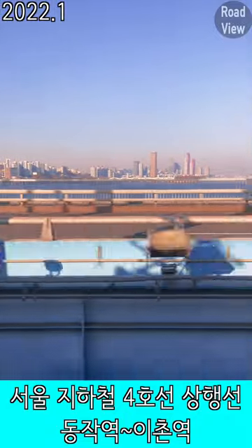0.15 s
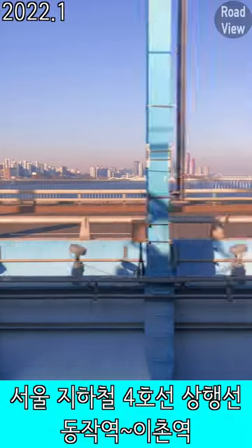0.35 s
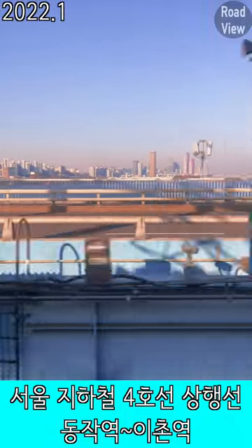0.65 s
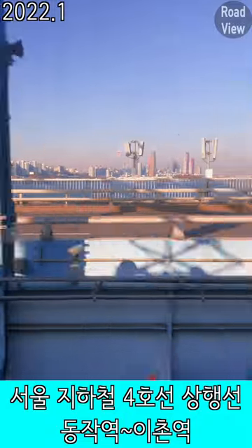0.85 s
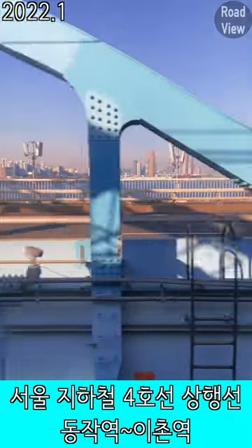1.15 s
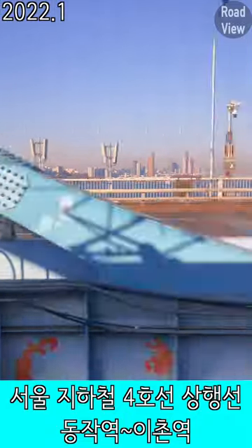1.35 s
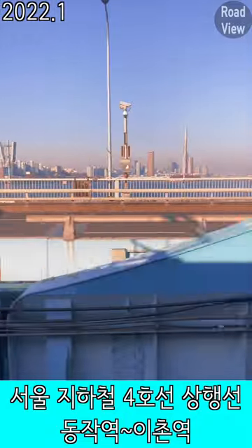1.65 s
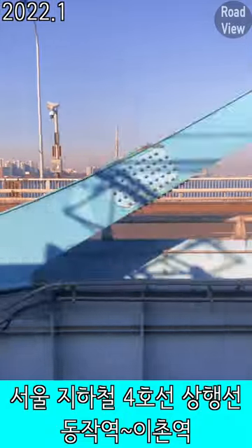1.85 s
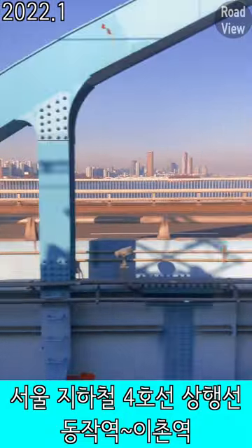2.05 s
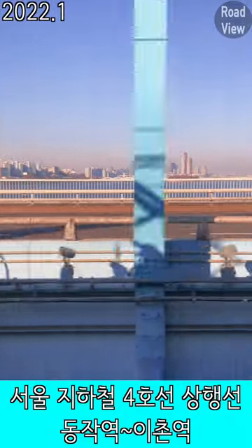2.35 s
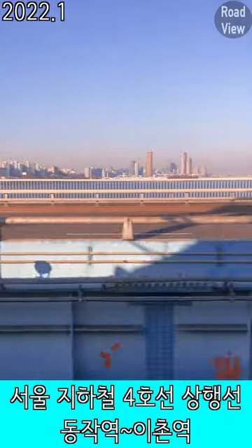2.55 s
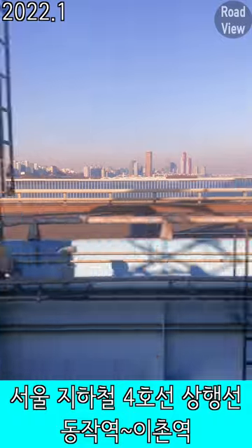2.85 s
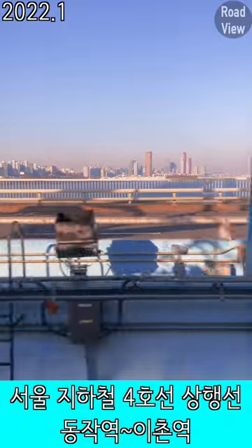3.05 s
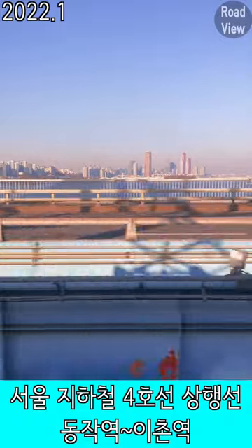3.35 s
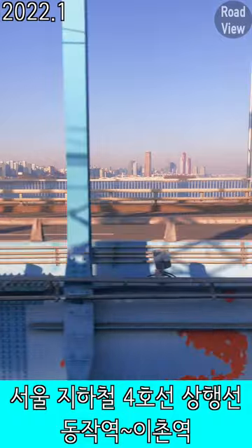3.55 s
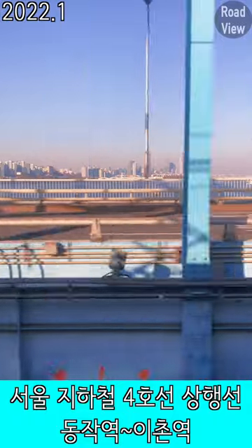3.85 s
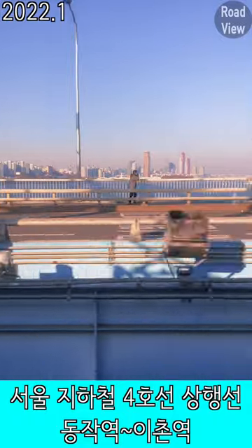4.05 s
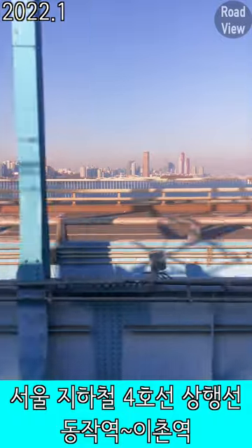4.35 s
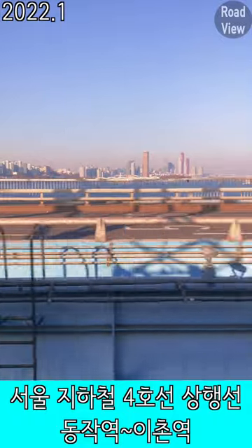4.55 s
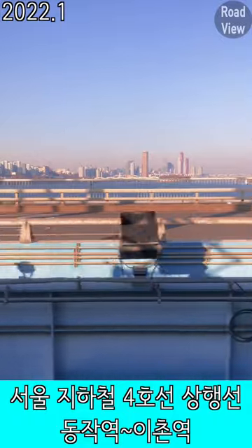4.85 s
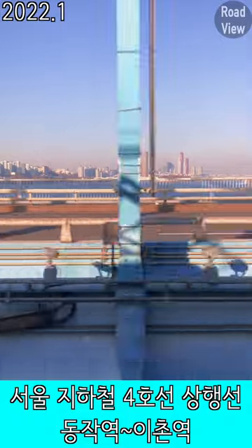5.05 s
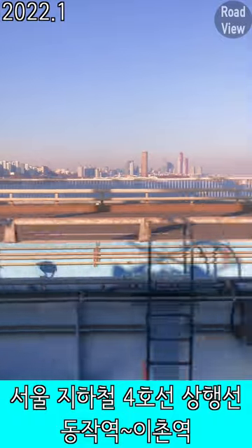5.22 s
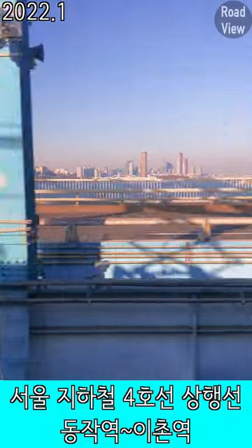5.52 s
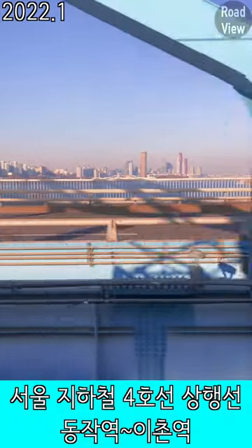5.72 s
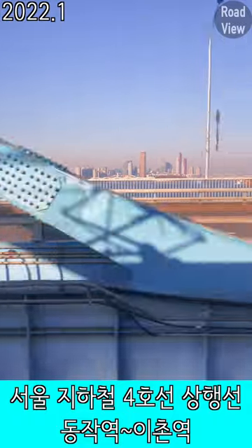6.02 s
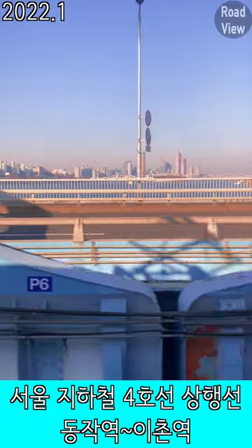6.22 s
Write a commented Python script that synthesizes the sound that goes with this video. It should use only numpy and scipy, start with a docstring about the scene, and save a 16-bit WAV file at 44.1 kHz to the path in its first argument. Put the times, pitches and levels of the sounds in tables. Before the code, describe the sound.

From inside a moving train car, close to the window, comes a deep, even rumble of wheels with the steel bridge booming underneath. Above it a metallic ringing and hiss rise and fall as steelwork goes by. Faint short squeaks, a bright tick and several blunt rail joint knocks come first. After a stretch of plain rolling, more knocks follow, and the boom grows stronger near the end.

```python
"""Booming girders and rumbling wheels, heard at the window of a metro car crossing a steel truss bridge.
The wheels ring and the rails hiss, swelling as posts of the truss pass and reflect them. Axles thud over
rail joints and loose fittings tick, among faint squeaks and very high whistles. The sound reaches a
phone's two microphone ports, the left a little before the right."""
import sys
import numpy as np
from scipy import signal
from scipy.fft import rfft, irfft, next_fast_len
from scipy.io import wavfile
from scipy.ndimage import uniform_filter1d, map_coordinates

SR = 44100
rng = np.random.default_rng(int(sys.argv[2]) if len(sys.argv) > 2 else 0)


def wav_record(signal):
    """Record a signal, one row per channel, as 16-bit PCM in the file named by sys.argv[1]."""
    frames = np.transpose(np.atleast_2d(signal))
    bounded = np.clip(frames, -1, 1)
    # unit amplitude maps onto the largest positive 16-bit level
    quanta = np.round(bounded * 32767).astype(np.int16)
    wavfile.write(sys.argv[1], SR, quanta)


N = 281343


def amp(db):
    """Gain of a level in dB."""
    return 10 ** (np.asarray(db) / 20)


def unit_rms(x):
    """x at rms 1."""
    return x / np.sqrt(np.mean(x ** 2) + 1e-20)


def at_hz(points, hz):
    """(freq_hz, value) points interpolated on a log axis."""
    freq_hz, values = np.transpose(points)
    return np.interp(np.log(hz + 1), np.log(freq_hz + 1), values)


def curves(rows):
    """One value per sample for each column after time_s."""
    time_s, *columns = np.transpose(rows)
    return [np.interp(np.arange(N) / SR, time_s, column) for column in columns]


def wobble(knots_per_s):
    """Smooth random curve."""
    knots = rng.standard_normal(int(N * knots_per_s / SR) + 4)
    return map_coordinates(knots, [np.arange(N) * knots_per_s / SR])


def swells(middle_s, gain_db, length_s):
    """Sum of bell-shaped gains in dB, per sample."""
    t = np.arange(0, N / SR + .01, .002)
    bells = np.broadcast(middle_s, gain_db, length_s)
    total_db = sum(db * np.exp(-(2 * (t - at_s) / span_s) ** 2) for at_s, db, span_s in bells)
    return curves(np.transpose([t, total_db]))[0]


def filtered(x, response):
    """x through a complex frequency response."""
    n = x.shape[-1]
    size = next_fast_len(n + SR // 4)
    return irfft(rfft(x, size) * response(np.fft.rfftfreq(size, 1 / SR)), size)[..., :n]


def filtered_ongoing(x, response):
    """Filtering with mirrored ends, for a sound that goes on before and after."""
    edge = 4096
    padded = np.pad(x, [(0, 0), (edge, edge)], "reflect", reflect_type="odd")
    return filtered(padded, response)[:, edge:-edge]


def patchy_noise(spectrum, patchy_db):
    """Two independent noises of one colour, rms 1, sharing patches of random gain."""
    bins = signal.stft(rng.standard_normal((2, N)), nperseg=512)[2]
    patches = uniform_filter1d(rng.standard_normal(bins.shape[1:]), size=6, axis=0)
    patches = uniform_filter1d(patches, size=10, axis=1)
    pair = signal.istft(bins * amp(patchy_db * unit_rms(patches)), nperseg=512)[1][:, :N]
    return unit_rms(filtered(pair, lambda hz: amp(at_hz(spectrum, hz))))


def mode_noise(modes, envelope):
    """Two independent enveloped noises, passed twice through (pitch_hz, width_hz, level_db) modes."""
    def response(f):
        return sum((-1) ** k * amp(db) * 1j * f * width_hz / (hz * hz - f * f + 1j * f * width_hz)
                   for k, (hz, width_hz, db) in enumerate(modes)) ** 2
    noise = rng.standard_normal((2, len(envelope)))
    return filtered(noise * envelope, response) / np.sqrt(np.mean(filtered(noise, response) ** 2))


def add(out, start_s, x):
    """Mixes x into out from start_s."""
    i = max(round(start_s * SR), 0)
    out[:, i:i + x.shape[1]] += x[:, :N - i]


def deck_mode(pitch_hz, level_db, waver_hz):
    """One deck mode, wavering and throbbing at random."""
    phase = 2 * np.pi * np.cumsum(pitch_hz + waver_hz * wobble(15)) / SR
    return np.sqrt(2) * amp(level_db - 0.5 * wobble(17)) * np.sin(phase) * [[1], [-.5]]


# main girder mode: time_s, pitch_hz
BOOM_PITCH = [(0.0, 80.3), (0.14, 69.9), (0.37, 72.4), (0.67, 58.36), (0.85, 72.3), (1.62, 72.2),
              (1.7, 63.1), (2.02, 71.3), (2.22, 88.85), (2.42, 61.2), (2.84, 58.96), (2.98, 68.63),
              (3.32, 72.2), (3.45, 59.7), (3.57, 71.13), (3.87, 76.1), (3.96, 65.1), (4.58, 73.7),
              (5.17, 64.6), (5.26, 77.1), (5.42, 69.75), (5.7, 77.13), (6.29, 63), (6.38, 73.3)]
# its throb: time_s, level_db
BOOM_LEVEL = [(0.0, -21), (0.07, -31), (0.1, -23), (0.28, -17.5), (0.39, -29), (0.44, -21), (0.83, -24),
              (1.28, -14.5), (1.9, -27.5), (2.18, -14.5), (2.22, -35), (2.33, -12.5), (2.42, -31),
              (2.47, -18.5), (2.91, -28), (3.07, -19), (3.11, -27), (3.22, -19), (3.29, -37), (3.32, -19),
              (3.52, -32), (3.55, -41), (3.64, -14.5), (3.7, -32), (3.75, -19), (3.92, -29), (4.17, -18),
              (4.21, -44), (4.26, -15), (4.39, -26), (4.44, -16), (4.48, -27), (4.67, -19.5), (4.78, -32),
              (4.94, -25), (4.97, -13), (5.08, -23.5), (5.4, -12), (5.45, -29), (5.54, -12.5), (5.63, -9),
              (5.69, -20), (5.76, -7.5), (5.86, -26), (6.06, -14), (6.24, -43), (6.29, -16), (6.38, -33)]
# jolts to the higher deck mode: middle_s, gain_db
DECK_JOLTS = [(2.86, 9.5), (3.13, 5), (5.69, 12), (5.91, 9)]
def girder_boom():
    """The main girder mode throbs as axles load the span; jolts swell a higher hum."""
    boom = deck_mode(*curves(BOOM_PITCH), *curves(BOOM_LEVEL), waver_hz=2.27)
    jolt_db = swells(*np.transpose(DECK_JOLTS), length_s=0.11)
    hum = deck_mode(pitch_hz=122.75, level_db=-31.5 + jolt_db, waver_hz=3.24)
    return boom + hum


# noise under the car: time_s, rumble_db, rolling_db, shake_db
UNDERCARRIAGE_LEVELS = [(0, -16, -29, -26), (.45, -18.5, -31, -22), (1.05, -17.5, -29, -30),
                        (1.4, -18, -29, -16), (1.8, -17.5, -30, -23), (2.15, -18.5, -29, -17.5),
                        (2.7, -18, -31.5, -23), (2.9, -19, -31, -24.5), (3.2, -17, -31.5, -26),
                        (3.4, -20, -32, -20.5), (3.85, -19.5, -34, -28), (4.1, -18, -31, -21.5),
                        (4.5, -18.5, -34, -23), (5.0, -19, -33.5, -21.5), (5.35, -17, -31.5, -21),
                        (5.55, -17, -30.5, -23), (5.7, -16.5, -30, -19.5), (5.82, -16.5, -32, -25),
                        (6.08, -20.5, -32, -22.5), (6.38, -15.5, -30, -27)]
# weaker deck resonances: pitch_hz, width_hz, level_db
SHAKE_MODES = [(48.9, 21, 5), (57.75, 32.7, 3.5), (90.8, 33.3, -1)]
# floor rumble and rolling noise: freq_hz, density_db
RUMBLE_SPECTRUM = [(40, -19), (70, -0.5), (100, -5), (145, -1.5), (200, -5), (240, -5), (300, -9),
                   (400, -15.5), (520, -35.5), (900, -88)]
ROLLING_SPECTRUM = [(200, -29), (380, -6), (500, 3), (600, -2), (690, 1.5), (780, -3.5), (1100, -8.5),
                    (1500, -18.5), (2500, -58)]
def undercarriage():
    """Rough wheels shake deck girders, car floor and bogie frame."""
    rumble_db, rolling_db, shake_db = curves(UNDERCARRIAGE_LEVELS)
    shake = amp(shake_db + 1.5 * wobble(8.1)) * mode_noise(SHAKE_MODES, np.ones(N))
    rumble = amp(rumble_db + 0.23 * wobble(24)) * patchy_noise(RUMBLE_SPECTRUM, patchy_db=-0.06)
    rolling = amp(rolling_db + 0.26 * wobble(14)) * patchy_noise(ROLLING_SPECTRUM, patchy_db=1.4)
    return shake + rumble + rolling


def singing_mode(pitch_hz, width_hz, level_db, swings_per_s):
    """One wheel or rail mode, coming and going at random."""
    swing_db = 2.5 * wobble(swings_per_s)
    return amp(level_db + swing_db) * mode_noise([(pitch_hz, width_hz, 0)], np.ones(N))


# lower and upper wheel mode: pitch_hz, width_hz
WHEEL_MODES = [(2005, 79), (3470, 440)]
# their swells and dips: middle_s, lower_gain_db, upper_gain_db, length_s
SONG_SWELLS = [(.14, -6, -1, .12), (.4, 8, 1, 0.38), (0.617, 10, 3, 0.069), (.9, 8.5, 5, 0.18),
               (1.318, -12, 5, 0.14), (2.436, 12, 2, 0.16), (3.25, 10.5, 0, .12), (3.39, 11, -3, 0.15),
               (3.876, 12, 1, 0.13), (4.031, 6, 2, 0.17), (4.177, 10, 4, 0.053), (4.315, -5, 4, 0.22),
               (4.66, 7, -6, 0.093), (5.25, 7, 4, 0.45), (5.59, -14, 6, 0.13), (5.95, 8, 2, 0.11)]
SONG_OVER_RING_DB = [-15, -9.5]
def wheel_song(ring_db):
    """Two wheel modes sing out of the broad ring at moments."""
    middle_s, *gains_db, length_s = np.transpose(SONG_SWELLS)
    song = np.zeros((2, N))
    for offset_db, gain_db, (pitch_hz, width_hz) in zip(SONG_OVER_RING_DB, gains_db, WHEEL_MODES):
        level_db = ring_db + offset_db + swells(middle_s, gain_db, length_s)
        song += singing_mode(pitch_hz, width_hz, level_db, swings_per_s=6.5)
    return song


# noise beside the car: time_s, ring_db, hiss_db
WHEEL_RAIL_LEVELS = [(0.0, -37, -41.5), (0.48, -41, -46.5), (1.17, -37.5, -44), (1.72, -39.5, -43.5),
                     (2.15, -37, -44), (2.65, -40.5, -46), (3.27, -39.5, -46.5), (3.66, -43, -48.5),
                     (4.16, -40.5, -46), (4.89, -42, -48), (5.44, -38.5, -44), (6.06, -40.5, -48.5),
                     (6.38, -39.5, -47.5)]
# steelwork passing close: middle_s, ring_gain_db, hiss_gain_db, length_s
TRUSS_POSTS = [(0.595, 2, 3.5, 0.17), (0.89, 0.5, 6, 0.28), (1.314, 5, 4.5, 0.16), (1.691, 4, 2, 0.1),
               (2.016, 2, 4.5, 0.11), (2.144, 1.5, 2.5, 0.081), (4.35, 2.5, 3.5, 0.13),
               (4.683, 5, 3, 0.034), (5.262, 2, 0, 0.24), (5.63, 2.5, 3.5, 0.15), (6.295, 3, 5, 0.18)]
# wheel ring and rail hiss: freq_hz, density_db
RING_SPECTRUM = [(600, -46), (1200, -2), (1700, -0.5), (2000, 0.5), (2300, -1), (2600, -2.5), (3000, -4.5),
                 (3450, -3), (3900, -4.5), (4400, -13.5), (6000, -39)]
HISS_SPECTRUM = [(2500, -30), (4300, -3), (5000, 0), (6000, -1), (7500, -5.5), (7950, -9.5), (8600, -7),
                 (10100, -10.5), (10700, -8.5), (11400, -14.5), (12600, -17.5), (14600, -20), (15300, -25),
                 (15700, -30), (15900, -70)]
# faint wheel and rail modes: pitch_hz, width_hz, over_ring_db
FAINT_MODES = [(689, 63, -11), (1678, 120, -15), (2627, 120, -15), (1275, 47, -26), (3600, 69, -19.5),
               (7650, 160, -36)]
def wheels_and_rails():
    """Wheel ring and rail hiss, thrown back at the window by passing steelwork."""
    middle_s, ring_gain_db, hiss_gain_db, length_s = np.transpose(TRUSS_POSTS)
    ring_db, hiss_db = curves(WHEEL_RAIL_LEVELS)
    ring_db += swells(middle_s, ring_gain_db, length_s)
    hiss_db += swells(middle_s, hiss_gain_db, length_s)
    flutter = wobble(21.9)
    ring = amp(ring_db + .7 * flutter) * patchy_noise(RING_SPECTRUM, patchy_db=.9)
    song = wheel_song(ring_db)
    hiss = amp(hiss_db + 0.3 * flutter + 0.7 * wobble(40)) * patchy_noise(HISS_SPECTRUM, patchy_db=2.0)
    faint = sum(singing_mode(pitch_hz, width_hz, ring_db + over_ring_db, swings_per_s=8)
                for pitch_hz, width_hz, over_ring_db in FAINT_MODES)
    return ring + song + faint + hiss


# squeaks and whistles: middle_s, pitch_hz, width_hz, level_db, half_length_s
SQUEAKS_AND_WHISTLES = [(0.634, 5900, 300, -47, .08), (0.804, 4730, 300, -48, 0.035),
                        (0.885, 5900, 700, -41, 0.082), (0.964, 5030, 298, -43, 0.028),
                        (1.26, 9200, 400, -56, 0.058), (1.677, 5760, 597, -41, 0.043),
                        (1.75, 4510, 450, -41, 0.085), (2.534, 1149, 350, -37.5, 0.076),
                        (1.99, 8600, 510, -54, 0.063), (2.11, 14500, 98.96, -62, 0.099),
                        (3.35, 14400, 200.3, -64, 0.046), (4.37, 14300, 301.2, -68, 0.044),
                        (6.283, 10900, 400, -59.5, 0.14)]
def squeaks_and_whistles():
    """Short squeaks and faint, very high whistles: swells of narrow-band noise."""
    out = np.zeros((2, N))
    for middle_s, pitch_hz, width_hz, level_db, half_length_s in SQUEAKS_AND_WHISTLES:
        swell = np.hanning(round(2 * half_length_s * SR))
        add(out, middle_s - half_length_s, amp(level_db) * mode_noise([(pitch_hz, width_hz, 0)], swell))
    return out


# axle blows: start_s, level_db, thud_gain_db, clack_gain_db, boom_gain_db, rattle_t60_s, pitch_ratio
JOINT_BLOWS = [(0.923, -21, 3, -3, 9, 0.16, 0.9), (1.211, -9.5, -15, -15, 1.5, 0.13, 1.05),
               (1.509, -12.5, -1, -7.5, -2, 0.24, 0.92), (2.116, -15, -2, -8.5, -1, 0.28, 0.98),
               (2.171, -17.5, 0, -18, -8, 0.23, 0.78), (2.468, -22, 9.5, 1, 3, 0.16, 0.88),
               (4.091, -19.5, -2, -5, 5, 0.25, 0.98), (4.365, -15, -3.5, -12, 4, 0.32, 0.94),
               (4.655, -20, -9, -7, 5.5, 0.31, 1.01), (4.682, -22, -10, -5.5, 5, 0.24, 1.05),
               (4.942, -15.5, 2.5, -7, 0.5, 0.28, 0.91), (5.549, -11.5, 4, -19, -1, 0.083, 0.92),
               (6.283, -25, -3, -7, 12.5, 0.12, 1.07)]
# floor pan, car body (thud), bogie frame (clack), deck (boom): pitch_hz, ring_t60_s
STRUCK_MODES = [(342, 0.06), (192.5, 0.065), (733, 0.065), (119.9, 0.38)]
RATTLE_OVER_RING_DB, RATTLE_WIDTH_RATIOS = [-2.5, -4.5, -2, -1.5], [0.38, 0.53, 0.4, 0.44]
KNOCK_HZ, KNOCK_WIDTH_HZ, KNOCK_OVER_CLACK_DB, KNOCK_T60_S = 606, 480, 0.5, .03
RISE_CYCLES = 0.76
def rail_joints():
    """Each axle drops into the gap: a blunt knock, then four modes ring and rattle."""
    out, t = np.zeros((2, N)), np.arange(SR // 3) / SR
    for start_s, level_db, thud_db, clack_db, boom_db, rattle_t60_s, pitch_ratio in JOINT_BLOWS:
        contact = amp(-60 * t / KNOCK_T60_S) * (1 - np.exp(-t / 0.0011))
        knock = mode_noise([(KNOCK_HZ, KNOCK_WIDTH_HZ, 0)], contact)
        add(out, start_s, amp(level_db + clack_db + KNOCK_OVER_CLACK_DB) * knock)
        modes = zip([0, thud_db, clack_db, boom_db], STRUCK_MODES,
                    RATTLE_OVER_RING_DB, RATTLE_WIDTH_RATIOS)
        for gain_db, (pitch_hz, ring_t60_s), rattle_db, width_ratio in modes:
            hz = pitch_hz * pitch_ratio
            rise = 1 - np.exp(-t * hz / RISE_CYCLES)
            phase = 2 * np.pi * hz * t + np.array([[0], [1.3]])
            ring = rise * amp(-60 * t / ring_t60_s) * np.sin(phase)
            rattle = mode_noise([(hz, width_ratio * hz, 0)], rise * amp(-60 * t / rattle_t60_s))
            add(out, start_s, amp(level_db + gain_db) * (ring + amp(rattle_db) * rattle))
    return out


# loose fittings: time_s, level_db, centre_hz, width_hz, snap_t60_s
FITTING_TICKS = [(1.0901, -15, 7860, 6000, 0.014), (2.285, -49, 12060, 7980, 0.044),
                 (4.071, -37, 9500, 2540, 0.032), (4.695, -42, 9800, 6100, 0.056)]
TAIL_DB, TAIL_T60_RATIO = -14.5, 6.2
def fitting_ticks():
    """Loose fittings give a bright snap and a weaker, longer after-rattle."""
    out, t = np.zeros((2, N)), np.arange(SR // 10) / SR
    for time_s, level_db, centre_hz, width_hz, snap_t60_s in FITTING_TICKS:
        fall_db = -60 * t / snap_t60_s
        rise = (1 - np.exp(-t / 0.0013)) ** 2
        envelope = rise * (amp(fall_db) + amp(TAIL_DB + fall_db / TAIL_T60_RATIO))
        add(out, time_s - .001, amp(level_db) * mode_noise([(centre_hz, width_hz, 0)], envelope))
    return out


# likeness of the ports: freq_hz, coherence
PORT_COHERENCE = [(60, .988), (200, .988), (330, .93), (520, .66), (900, .45), (1500, .3), (2500, .3),
                  (3450, .85), (4300, .55), (5400, .99), (7000, .86), (8000, .99), (8900, .995),
                  (10000, .78), (11200, .997), (12500, .995), (13400, .55), (14300, .99)]
# phase lead of the left port: freq_hz, lead_rad
PORT_LEAD = [(60, 0), (340, .1), (780, 1.3), (2700, 1.4), (3900, 1.9), (5300, 3.05), (5700, 3.25),
             (7300, 5), (8000, 6.2), (8900, 6.3), (11200, 9.4), (12700, 9.46), (13900, 12.4),
             (16000, 12.57)]
def microphone_ports(pair):
    """Two sound fields become left and right: partly alike, the left leading."""
    def mid_side_gains(hz):
        angle = np.arccos(at_hz(PORT_COHERENCE, hz)) / 2
        return np.array([np.cos(angle), np.sin(angle)])
    def lead(hz):
        return np.exp(.5j * at_hz(PORT_LEAD, hz) * np.array([[1], [-1]]))
    mid, side = filtered_ongoing(pair, mid_side_gains)
    return filtered_ongoing(np.array([mid + side, mid - side]), lead)


DIRECT_TICKS_DB = -12
def scene():
    """All sources at the ports, plus a direct share of the close ticks, unalike left and right."""
    ticks = fitting_ticks()
    running = girder_boom() + undercarriage() + wheels_and_rails() + rail_joints()
    direct_ticks = amp(DIRECT_TICKS_DB) * ticks[::-1]
    return microphone_ports(running + squeaks_and_whistles() + ticks) + direct_ticks


CEILING, KNEE_ORDER, TOP_HZ, ROLLOFF_WIDTH_HZ = .95, 4, 16400, 500
def record(dry):
    """The microphone rounds off the highest peaks; the phone limits the band."""
    soft = dry / (1 + np.abs(dry / CEILING) ** KNEE_ORDER) ** (1 / KNEE_ORDER)
    return filtered_ongoing(soft, lambda hz: np.clip((TOP_HZ - hz) / ROLLOFF_WIDTH_HZ, 0, 1))


dry = scene()
out = record(dry)
wav_record(out)
```